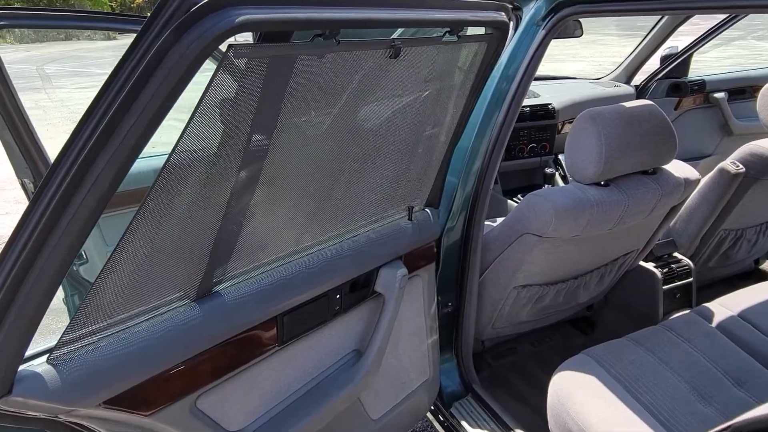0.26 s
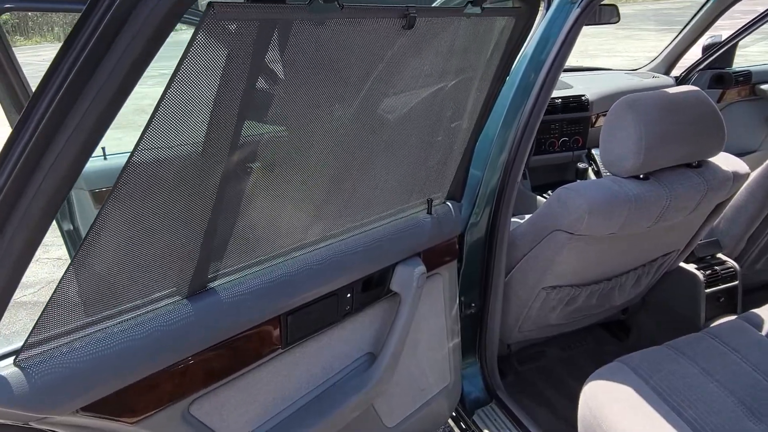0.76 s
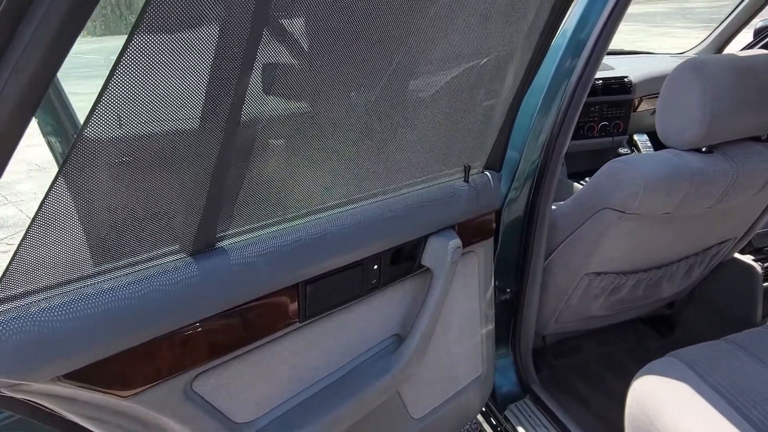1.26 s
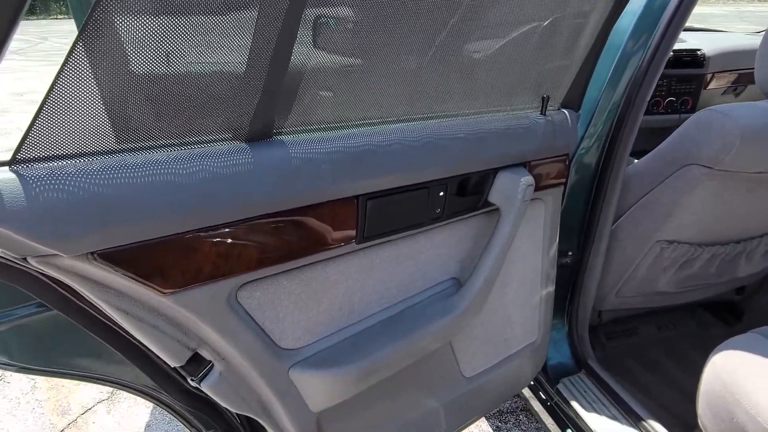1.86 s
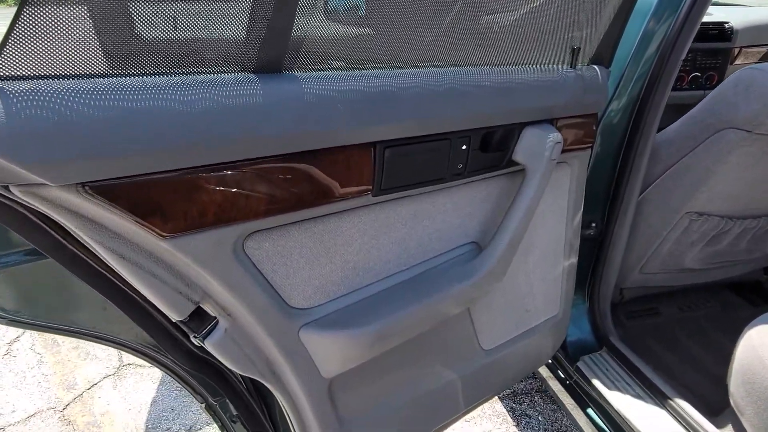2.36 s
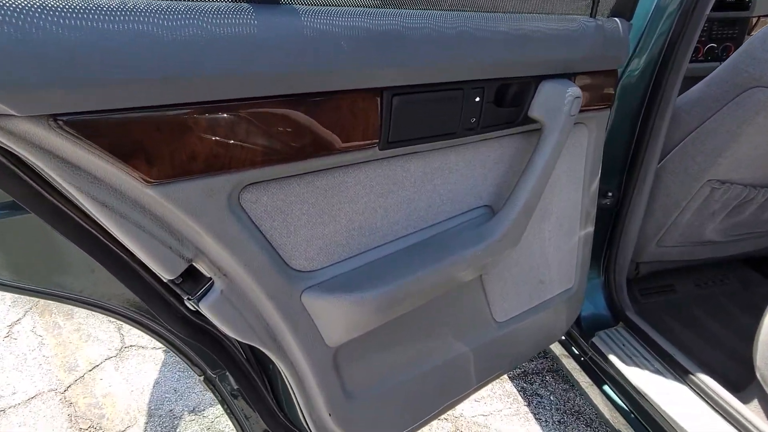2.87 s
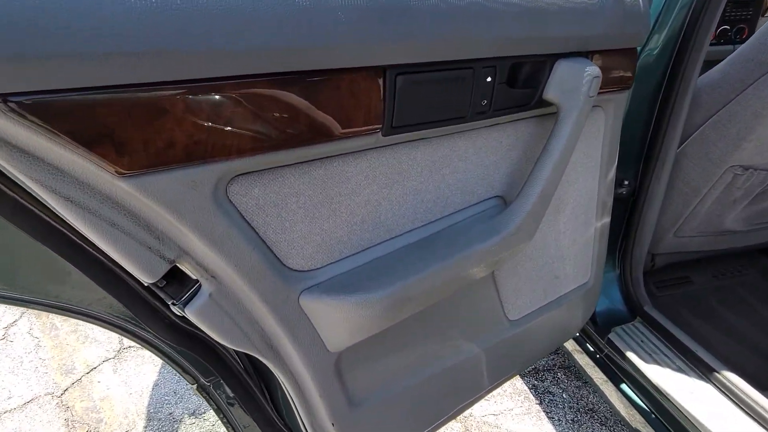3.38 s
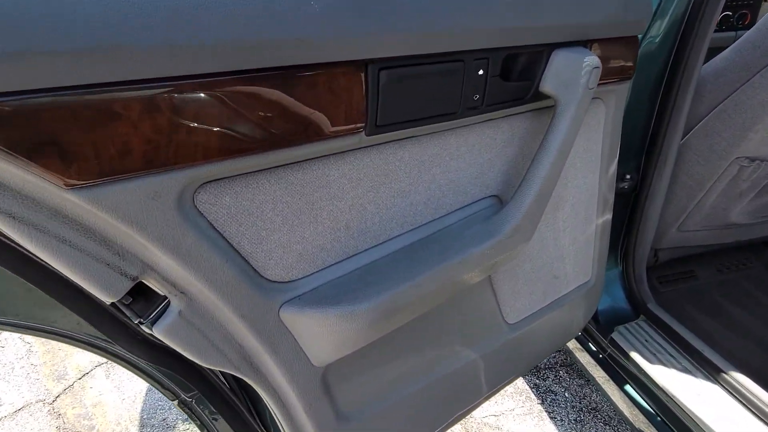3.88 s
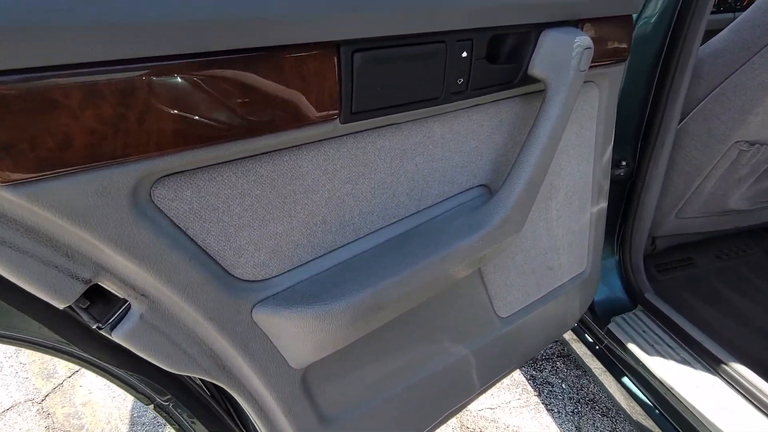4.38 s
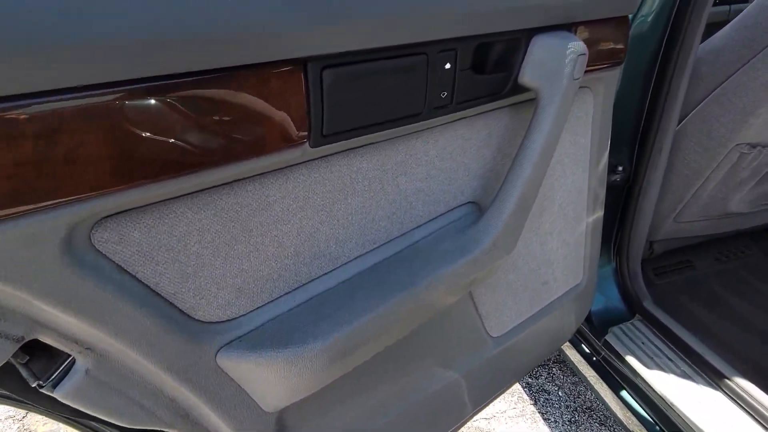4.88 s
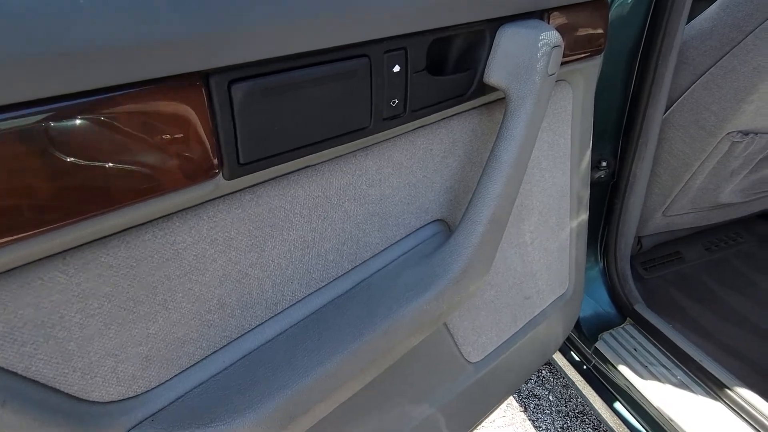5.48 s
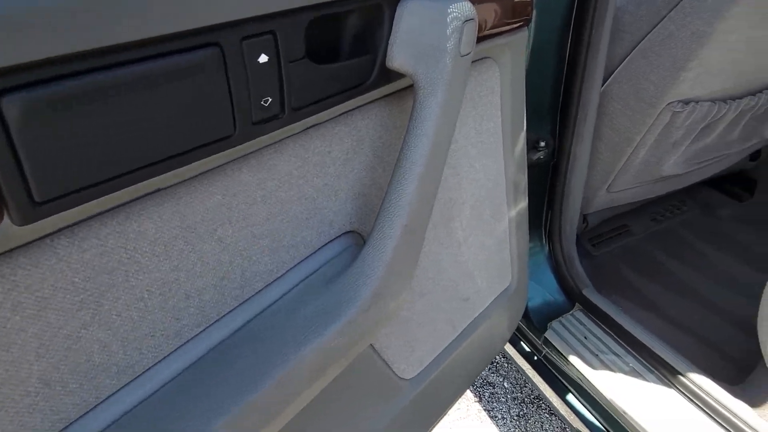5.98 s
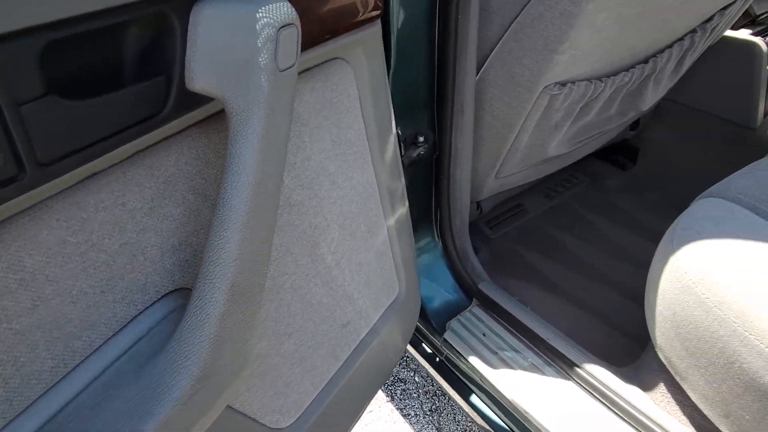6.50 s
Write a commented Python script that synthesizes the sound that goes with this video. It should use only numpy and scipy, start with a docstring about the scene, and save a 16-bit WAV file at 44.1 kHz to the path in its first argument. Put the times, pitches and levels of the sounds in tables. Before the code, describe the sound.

A parked car idles outdoors with low rumble and even fan rush, its exhaust hum swelling mid-way then easing, with small close handling clicks.

```python
"""First comes a low rumble with the even rush of an engine fan: a car idling outdoors, doors open.
Its exhaust hum, built from multiples of the firing rate, swells on the way to a rear door, then eases.
The rumble, fan and hiss are shaped noise; close handling clicks are short noise bursts that ring.
Scuffs are grainy hiss. A far bird whistles three rising notes, and thin tones squeak faintly."""
import sys
import numpy as np
from scipy import signal
from scipy.fft import rfft, irfft
from scipy.io import wavfile
from scipy.ndimage import uniform_filter1d

SR = 44100
rng = np.random.default_rng(int(sys.argv[2]) if len(sys.argv) > 2 else 0)


def dump(signal):
    """Clip the signal to [-1, 1] and save it as 16-bit WAV at the path in sys.argv[1]."""
    limited = np.clip(np.atleast_2d(signal).T, -1, 1)
    pcm = np.round(limited * 32767).astype(np.int16)
    wavfile.write(sys.argv[1], SR, pcm)


N = 297234
T = np.arange(N) / SR
BINS = np.fft.rfftfreq(N, 1 / SR)


def gain_of(db):
    """Decibels to amplitude."""
    return 10 ** (np.asarray(db) / 20)


def evened(x):
    """Scales to an rms (average strength) of 1."""
    return x / np.sqrt(np.mean(x ** 2) + 1e-20)


def curve(rows):
    """Joins (t/s, value) rows by straight lines."""
    return np.interp(T, *np.transpose(rows))


def read(points, hz):
    """Joins (f/Hz, value) rows on a log-frequency axis."""
    f, value = np.transpose(points)
    return np.interp(np.log(hz + 1), np.log(f + 1), value)


def drift(rate_hz):
    """Random wandering of rms 1, with little movement faster than rate_hz."""
    smooth = rfft(rng.standard_normal(N)) / (1 + (BINS / rate_hz) ** 4)
    return evened(irfft(smooth, N))


def move(middle_s, length_s):
    """A smooth passage from 0 to 1."""
    return .5 + .5 * np.sin(np.pi * np.clip((T - middle_s) / length_s, -.5, .5))


def stroke(t, length_s, attack_s, release_s):
    """Attack, hold and release; silent before and after."""
    return np.clip(np.minimum(t / attack_s, (length_s - t) / release_s), 0, 1)


def left_right(mid, side):
    """Left and right from what they share and what differs between them."""
    return np.array([mid + side, mid - side])


def add(mix, s, sound):
    """Mixes a stereo sound in at time s."""
    part = mix[:, round(s * SR):][:, :sound.shape[1]]
    part += sound[:, :part.shape[1]]


# usual difference between left and right: (f/Hz, side-to-mid level/dB)
NOISE_WIDTH = [(60, -13), (120, -21), (200, -7), (300, -1.5), (430, -2.5), (700, 3.5), (950, 3.5),
               (1250, 8), (1650, 6.5), (2400, -0.5), (4400, 2), (8000, -0.5), (15000, 1)]


def noise(colour, width=NOISE_WIDTH):
    """Coloured noise; the usual width is alike in the bass, opposed near 1 kHz, unrelated above."""
    mid, side = rfft(rng.standard_normal((2, N))) * gain_of(read(colour, BINS))
    pair = irfft(left_right(mid, side * gain_of(read(width, BINS))), N)
    return pair / np.std(pair.mean(0))


def steadied(x, seconds):
    """Keeps the quick flutter of a noise and holds its slow level even."""
    return x / np.sqrt(uniform_filter1d(x.mean(0) ** 2, int(seconds * SR)) + 1e-6)


def rippled(x, ripple_db, size=500):
    """Reflections among the panels leave narrow peaks and dips in a steady rush."""
    ripple = evened(uniform_filter1d(rng.standard_normal(len(BINS)), size))
    return irfft(rfft(x) * gain_of(ripple_db * ripple), N)


def hum(turns, orders, waver, spread):
    """Multiples of the firing rate, wavering in strength and timing, slightly out of step left to right."""
    out = np.zeros((2, N))
    for order, db in orders:
        angle = 2 * np.pi * (order * turns + rng.random()) + waver * drift(14)
        strength = gain_of(db) * (1 + waver * drift(7.0))
        out += strength * left_right(np.cos(angle), spread * np.sin(angle))
    return np.sqrt(2) * out


# low rumble over time: (t/s, level/dB)
RUMBLE_LEVEL = [(0, -45), (0.8, -43), (1.05, -43.5), (1.4, -46), (1.7, -42), (1.95, -42), (2.3, -39.5),
                (2.6, -39.5), (3.1, -42), (3.65, -38.5), (4.2, -41), (5.3, -46), (5.8, -41), (6.15, -44),
                (6.33, -46.5), (6.5, -41), (6.74, -52)]
# its colour: (f/Hz, relative level/dB per Hz)
RUMBLE_TONE = [(15, -39), (24, -25.5), (34, -7.5), (50, -11), (65, 3.5), (85, 2), (105, 3), (122, 3.5),
               (145, -13), (220, -21.5), (400, -79.5)]
# deepest rumble over time: (t/s, level/dB)
DEEP_LEVEL = [(0, -45), (.33, -60), (.45, -52), (.9, -48.5), (1.65, -61), (2.1, -44.5), (2.5, -59),
              (2.9, -69.5), (3.55, -47.5), (4.1, -55), (4.55, -46.5), (5.1, -54), (5.45, -51), (6.2, -59.5),
              (6.74, -56)]
# its colour: (f/Hz, relative level/dB per Hz)
DEEP_TONE = [(15, -28), (25, -11.5), (35, -4), (50, 7), (60, 0), (80, -25.5), (200, -79)]


def rumble():
    """Uneven combustion: two bands of low noise, each with its own rise and fall."""
    low = gain_of(curve(RUMBLE_LEVEL)) * steadied(noise(RUMBLE_TONE), seconds=0.16)
    deep = gain_of(curve(DEEP_LEVEL)) * steadied(noise(DEEP_TONE), seconds=0.16)
    return low + deep


# fan rush, dimmed behind the door and louder in the doorway: (t/s, level/dB)
FAN_LEVEL = [(0, -46), (.9, -46.5), (1.7, -46.5), (2.6, -49), (3.5, -46.5), (4.2, -48), (4.7, -48),
             (5.1, -44), (5.5, -45), (5.85, -44), (6.3, -45.5), (6.5, -46), (6.74, -43.5)]
# colour of the rush outside: (f/Hz, relative level/dB per Hz)
OUTSIDE_TONE = [(70, -15.5), (140, 7.5), (240, 6), (430, -1), (510, 0), (600, -0.5), (770, -0.5),
                (1100, -6), (1500, -15.5), (2400, -21), (3300, -25.5), (4800, -37.5), (9000, -54),
                (15500, -59)]
# colour of the rush in the doorway: (f/Hz, relative level/dB per Hz)
DOORWAY_TONE = [(70, -17), (150, 8), (300, 4.5), (400, -6.5), (470, -5.5), (540, 3), (610, 4), (700, 2),
                (800, 0), (920, -6.5), (1100, -7), (1600, -16), (3200, -25.5), (4800, -40), (15500, -66)]
# difference between left and right in the doorway: (f/Hz, side-to-mid level/dB)
DOORWAY_SPREAD = [(120, -25), (200, -21), (320, 5), (420, 7.5), (620, -6.5), (700, -6), (800, 8.5),
                  (930, 6), (1130, 5.5), (1400, 7.5), (2400, 1), (15000, -2)]


def fan():
    """An even rush; in the doorway the cavity lifts 600-800 Hz and hollows out 400 Hz."""
    inside = move(middle_s=4.78, length_s=0.47)
    outside = rippled(noise(OUTSIDE_TONE), ripple_db=.9)
    doorway = rippled(noise(DOORWAY_TONE, DOORWAY_SPREAD), ripple_db=.9)
    rush = np.sqrt(1 - inside) * outside + np.sqrt(inside) * doorway
    return gain_of(curve(FAN_LEVEL) + 0.61 * drift(15)) * rush


# deep throb of the block, heard all round the car: (multiple of the firing rate, level/dB)
THROB_MULTIPLES = [(2, -56), (3, -55.5), (4, -57.5)]


def throb(turns):
    """The lowest multiples of the firing rate, at a set level throughout."""
    return hum(turns, THROB_MULTIPLES, waver=0.21, spread=0.068)


# exhaust boom, as the listener moves through its standing waves: (t/s, level/dB)
BOOM_LEVEL = [(0, -67), (1.1, -46.5), (1.67, -51.5), (1.9, -54), (2.15, -48), (2.6, -43.5), (2.76, -48),
              (2.93, -36), (3.2, -37), (3.42, -36), (3.58, -38), (3.69, -32), (3.85, -32.5), (3.95, -39),
              (4.03, -33.5), (4.33, -40.5), (4.51, -33), (4.62, -39.5), (4.8, -35.5), (4.96, -34.5),
              (5.04, -40.5), (5.13, -32.5), (5.25, -38), (5.6, -38), (5.85, -37.5), (6.0, -42), (6.15, -41),
              (6.35, -48), (6.74, -48.5)]
# its tones: (multiple of the firing rate, relative level/dB)
BOOM_MULTIPLES = [(4, -5.5), (5, 0)]
FLUTTER, FLUTTER_HZ = .2, 16  # rms share of the strength, upper speed of the flutter (Hz)


def boom(turns):
    """Exhaust hum that swells and dips along its standing waves; uneven combustion makes it flutter."""
    tones = hum(turns, BOOM_MULTIPLES, waver=0.22, spread=0.051)
    return gain_of(curve(BOOM_LEVEL)) * tones * (1 + FLUTTER * drift(FLUTTER_HZ))


# overtone just above the boom, with a peak where the drone has a node: (t/s, level/dB)
OVERTONE_LEVEL = [(0, -66), (2.6, -62), (2.9, -55), (3.15, -58.5), (3.47, -41.5), (3.65, -50), (3.85, -42),
                  (4.3, -57.5), (4.9, -54), (5.4, -55.5), (6.74, -62)]
# its tone: (multiple of the firing rate, relative level/dB)
OVERTONE_MULTIPLES = [(6, -2)]


def overtone(turns):
    """One more multiple of the firing rate, rising and falling on its own."""
    return gain_of(curve(OVERTONE_LEVEL)) * hum(turns, OVERTONE_MULTIPLES, waver=0.19, spread=.15)


# panel drone, with standing waves of its own: (t/s, level/dB)
DRONE_LEVEL = [(0, -75), (2.55, -58.5), (2.75, -51), (2.9, -55), (3.1, -50), (3.27, -44.5), (3.52, -62),
               (3.75, -44), (3.97, -58.5), (4.25, -51.5), (4.55, -57), (4.8, -46), (5.05, -51.5),
               (5.35, -46), (5.7, -55.5), (6.74, -56.5)]
# its tones: (multiple of the firing rate, relative level/dB)
DRONE_MULTIPLES = [(7, -2.5), (9, -1)]


def drone(turns):
    """The firing pulses set the panels droning, louder and softer from place to place."""
    return gain_of(curve(DRONE_LEVEL)) * hum(turns, DRONE_MULTIPLES, waver=0.24, spread=0.25)


# buzz of the body panels, strongest close to the door: (t/s, level/dB)
BUZZ_LEVEL = [(0, -64.5), (2.5, -59.5), (2.8, -54), (3.15, -49), (3.4, -58), (3.56, -45), (3.73, -43),
              (3.95, -55), (4.2, -50), (4.38, -60.5), (4.53, -46.5), (4.65, -62), (4.85, -44.5),
              (5.05, -46), (5.3, -46.5), (5.6, -53), (5.9, -59), (6.2, -52.5), (6.74, -62)]
# its tones: (multiple of the firing rate, relative level/dB)
BUZZ_MULTIPLES = [(11, -1.5), (13, -4.5)]


def buzz(turns):
    """Higher multiples of the firing rate buzz in the body panels."""
    return gain_of(curve(BUZZ_LEVEL)) * hum(turns, BUZZ_MULTIPLES, waver=.17, spread=0.33)


# exhaust rasp and puffs, flaring as the listener passes the door sill: (t/s, level/dB)
RASP_LEVEL = [(0, -70.5), (2.5, -58.5), (3.0, -54), (3.2, -49.5), (3.4, -55.5), (3.6, -46.5), (3.8, -59.5),
              (3.95, -57), (4.6, -56.5), (5.1, -52.5), (5.3, -55.5), (5.5, -64.5), (6.74, -73)]
# tones of the rasp: (multiple of the firing rate, relative level/dB)
RASP_MULTIPLES = [(14, -15.5), (15, -6), (16, -6.5), (17, -12.5), (18, -10.5), (22, -6.5), (23, -13)]
PUFFS_DB, PUFF_DEPTH = 0.5, .45  # level within the rasp (dB), pulsing over one firing (0-1)


def rasp(turns):
    """High multiples of the firing rate, beside combustion noise that puffs once per firing."""
    # (f/Hz, relative level/dB per Hz)
    puffs = noise([(100, -16.0), (190, -4.5), (400, 5.0), (520, 4.5), (610, -6.0), (780, 4),
                   (1300, -28), (4000, -63.5)])
    puffs *= gain_of(PUFFS_DB) * (1 + PUFF_DEPTH * np.cos(2 * np.pi * turns))
    tones = hum(turns, RASP_MULTIPLES, waver=0.38, spread=0.29)
    return gain_of(curve(RASP_LEVEL)) * (tones + puffs)


FIRING_HZ, SPEED_WAVER = 24.77, .0018  # firing rate (Hz), rms share by which it wanders


def engine():
    """All the tones follow one slightly unsteady count of firings, so they waver in pitch together."""
    turns = np.cumsum(FIRING_HZ * (1 + SPEED_WAVER * drift(2.33))) / SR
    exhaust = boom(turns) + overtone(turns) + rasp(turns)
    panels = drone(turns) + buzz(turns)
    return throb(turns) + exhaust + panels + rumble() + surges()


# faint steady hiss: (f/Hz, relative level/dB per Hz)
HISS_TONE = [(2000, -10.5), (6200, 1.5), (7500, -1.5), (9000, -1.5), (11500, -7), (13000, -2),
             (15500, -5.5)]


def hiss():
    """Very faint treble noise at a steady level."""
    return gain_of(-85) * noise(HISS_TONE)


# strokes of clothes and shoes: (start t/s, length/s, level/dB, attack/s, release/s)
SCUFF_STROKES = [(-.4, 2.1, -75, 0.73, .1), (0.997, 0.79, -69, 0.1, 0.12), (1.1, .56, -66, 0.13, 0.13),
                 (2.525, 0.07, -68.5, .012, .04), (2.574, 0.067, -65.5, .015, .01),
                 (2.59, 0.03, -63, .012, .016), (2.639, 0.074, -61.5, .01, 0.035),
                 (2.682, .085, -67.5, .02, .035)]
# colour of sliding friction: (f/Hz, relative level/dB per Hz)
SCUFF_TONE = [(800, -22), (2000, 13), (3200, 8.5), (4600, -2), (6400, 3), (7700, -2), (9200, 0),
              (12000, -3.5), (15500, -5.5)]
# fibres catching: average rate (per s), fading time (s), lift of the hiss (share, before evening out)
CATCH_PER_S, CATCH_S, CATCH_LIFT = 220, .0008, .7


def scuffs():
    """Sliding friction: strokes of fine hiss swell and fade, grainy where fibres catch and let go."""
    power = np.zeros(N)
    for s, length, db, attack, release in SCUFF_STROKES:
        power += (gain_of(db) * stroke(T - s, length, attack, release)) ** 2
    catches = (rng.random(N) < CATCH_PER_S / SR) * np.minimum(rng.exponential(1, N), 3)
    fading = signal.lfilter([1], [1, -np.exp(-1 / (CATCH_S * SR))], catches)
    grain = evened(1 + CATCH_LIFT * fading)
    return np.sqrt(power) * grain * gain_of(0.51 * drift(60)) * noise(SCUFF_TONE)


def ring(hz, centre_hz, width):
    """Response of one broad resonance; the power makes it narrower and steeper."""
    return 1 / (1 + 1j * (hz / centre_hz - centre_hz / hz) / width) ** 2.6


# handling clicks: (t/s, level/dB over 5 ms, centre f/Hz, width as a share of the centre before
# ring() narrows it, left-right level/dB, fading time of the contact/s, relative knock level/dB)
CLICK_LIST = [(0.1864, -45, 2580, 0.59, 0, 0.0003, -20), (1.395, -47, 11800, 1.1, 3, .0004, -22),
              (1.3976, -56, 12000, .8, -2, .0003, -22), (1.717, -74, 7000, .9, 3, .004, -18),
              (2.825, -78, 9000, .5, -1, .005, -17), (3.797, -82, 6500, 0.72, 4, .001, -19.5),
              (3.847, -73, 5600, 0.81, 2.5, .001, -16), (3.952, -76.5, 7000, 0.99, 7, .001, -21),
              (4.304, -75, 10100, .35, 2, .003, -15), (4.407, -68.5, 3600, 0.67, 0, 0.0022, -25),
              (5.334, -69.5, 10000, 0.41, -1, 0.0044, -9), (5.579, -80, 10000, 1, 3, .0005, -15),
              (5.602, -70, 8000, .9, 3, .0012, -12), (5.693, -74.5, 9600, .2, 1, .007, -17),
              (5.727, -81, 9500, 1, 5, 0.00055, -22), (6.075, -75, 9700, .3, 0, .006, -16),
              (6.1728, -63.5, 8300, 1.3, 1, .0014, -6), (6.199, -75, 8000, .9, 1, .002, -10),
              (6.307, -73, 10000, .4, 0, .009, -16), (6.424, -52.5, 7800, 0.29, -1, 0.0008, -9),
              (6.532, -78, 9700, .2, 2, .008, -20)]
# reflections off the door and the ground: (delay t/s, relative level/dB)
NEAR_ECHOES = [(.0007, -27), (.0026, -15.5), (.0063, -16)]
# the plastic under each click: f/Hz, width as a share of that before ring() narrows it
KNOCK_HZ, KNOCK_WIDTH = 3470, 0.65


def clicks(tail_db, tail_t60):
    """Snaps or short scrapes ring a broad resonance and knock plastic, with echoes and a short tail."""
    out, t = np.zeros((2, N)), np.arange(4096) / SR
    hz = np.fft.rfftfreq(4096, 1 / SR) + 1  # 1 Hz up, to avoid dividing by zero
    for s, db, centre_hz, width, pan_db, contact_s, knock_db in CLICK_LIST:
        shared, apart = rng.standard_normal((2, len(t)))
        grit = left_right(shared, apart)
        snap = grit * np.exp(-t / contact_s)
        echoes = sum(gain_of(echo_db) * np.roll(snap, round(delay * SR), 1)
                     for delay, echo_db in NEAR_ECHOES)
        tail = grit * gain_of(tail_db - 60 * t / tail_t60)
        body = ring(hz, centre_hz, width) + gain_of(knock_db) * ring(hz, KNOCK_HZ, KNOCK_WIDTH)
        treble_limit = 1 + (hz / 15200) ** 16
        click = irfft(rfft(snap + echoes + tail) * body / treble_limit)
        size = np.sqrt(np.sum(click ** 2, 1, keepdims=True) / (.005 * SR))
        add(out, s, gain_of(db + pan_db * np.array([[.5], [-.5]])) * click / size)
    return out


# brief throbs in the rumble: (t/s at the peak, pitch f/Hz, peak level/dB)
SURGE_LIST = [(.44, 116, -44), (.71, 113, -40), (.8, 64, -41), (1.24, 98.4, -40), (1.51, 116, -40),
              (1.64, 120, -37.5), (1.78, 95.6, -37), (2.01, 88, -39.5), (2.57, 97.3, -36),
              (3.12, 74.7, -38), (4.75, 77.5, -41.5), (5.89, 80, -41.5), (6.17, 79, -38.5)]
SURGE_S = .05  # time from the peak down to about a third of it (s)


def surges():
    """The rumble gathers into brief low throbs, each a few cycles of one pitch."""
    out = np.zeros((2, N))
    for (s, pitch_hz, db), phase in zip(SURGE_LIST, rng.random(len(SURGE_LIST))):
        swell = np.exp(-((T - s) / SURGE_S) ** 2)
        out += np.sqrt(2) * gain_of(db) * swell * np.cos(2 * np.pi * (pitch_hz * T + phase))
    return out


# bird notes slide up, then hold:
# (start t/s, slide/s, hold/s, first f/Hz, held f/Hz, level/dB before quaver and flutter)
WHISTLE_NOTES = [(1.088, 0.049, 0.048, 2780, 3050, -64), (1.854, 0.09, 0.25, 2310, 2860, -71.5),
                 (2.647, .145, 0.072, 2200, 2820, -61)]
WHISTLE_RISE_S, WHISTLE_FADE_S = 0.018, 0.013
# quaver of a climbing note: rate (per s), dip in level (0-1), how stepped the pitch is (0-1)
TRILL_PER_S, TRILL_DEPTH, TRILL_STEP = 23, .35, .3
WHISTLE_WAVER, SLIDE_WAVER = .002, .015  # pitch roughness (share): throughout, and extra on the slide


def bird():
    """Far whistles climb with a rough quaver, then hold cleaner; scattering flutters left and right."""
    out = np.zeros((2, N))
    for s, slide_s, hold_s, first_hz, held_hz, db in WHISTLE_NOTES:
        t = np.arange(0, slide_s + hold_s, 1 / SR)
        trill = 2 * np.pi * TRILL_PER_S * t
        # 1 on the slide, fading to 0 just after it
        sliding = np.clip((slide_s + WHISTLE_RISE_S - t) / WHISTLE_RISE_S, 0, 1)
        stepped_t = t + TRILL_STEP * np.sin(trill) / (2 * np.pi * TRILL_PER_S)
        climb = np.minimum(stepped_t / slide_s, 1)
        roughness = (WHISTLE_WAVER + SLIDE_WAVER * sliding) * drift(120)[:len(t)]
        hz = first_hz * (held_hz / first_hz) ** climb * (1 + roughness)
        pulsing = 1 - TRILL_DEPTH * np.cos(trill / 2) ** 2 * sliding
        angle = 2 * np.pi * (np.cumsum(hz) / SR + np.array([[0], [.3]]))
        shape = stroke(t, slide_s + hold_s, WHISTLE_RISE_S, WHISTLE_FADE_S)
        add(out, s, np.sqrt(2) * gain_of(db) * pulsing * shape * np.sin(angle))
    return out * (.85 + .35 * np.array([drift(50), drift(50)]))


# thin faint squeaks: (t/s, length/s, pitch f/Hz, level/dB)
SQUEAK_LIST = [(1.969, 0.044, 1280, -59), (4.388, .036, 2630, -65.5), (4.94, 0.12, 2290, -69),
               (6.69, .06, 4200, -78)]


def squeaks(rough, rise_s):
    """Thin, faint squeaks: one tone each, its pitch unsteady by the share rough."""
    out = np.zeros((2, N))
    for s, length_s, pitch_hz, db in SQUEAK_LIST:
        t = np.arange(0, length_s, 1 / SR)
        hz = pitch_hz * (1 + rough * drift(120)[:len(t)])
        angle = 2 * np.pi * (np.cumsum(hz) / SR + np.array([[0], [.15]]))
        add(out, s, np.sqrt(2) * gain_of(db) * stroke(t, length_s, rise_s, rise_s) * np.sin(angle))
    return out


def scene():
    """The idling car, the small sounds beside it and the bird."""
    handling = scuffs() + clicks(tail_db=-22.5, tail_t60=0.085) + squeaks(rough=0.028, rise_s=0.014)
    return engine() + fan() + hiss() + handling + bird()


# left and right differ in colour: (f/Hz, left-right level/dB)
LEFT_RIGHT_TONE = [(60, 0), (120, -1), (270, 0.5), (430, -3.5), (740, -1.5), (1220, -1.5), (2200, -5),
                   (4400, 1), (7300, -2.5), (9000, 7.5), (11000, 1), (13000, -2.5), (15500, 6.5)]
TURN_FROM_DB, TURN_TO_DB = -.7, .5  # left-right balance before and after the turn (dB)
EDGE_HZ = 15800  # upper limit of the sound


def record(dry):
    """The colour of left and right, their balance as the listener turns, then the treble limit."""
    halves = [.5, -.5]  # each side takes half of a left-right difference
    heard = irfft(rfft(dry) * gain_of(np.outer(halves, read(LEFT_RIGHT_TONE, BINS))), N)
    turn = move(middle_s=3.6, length_s=2.2)
    balance_db = TURN_FROM_DB + (TURN_TO_DB - TURN_FROM_DB) * turn
    heard *= gain_of(np.outer(halves, balance_db))
    low_pass = signal.firwin(511, EDGE_HZ, window=("kaiser", 9), fs=SR)
    return signal.oaconvolve(heard, low_pass[None], "same")


dry = scene()
out = record(dry)
dump(out)
```